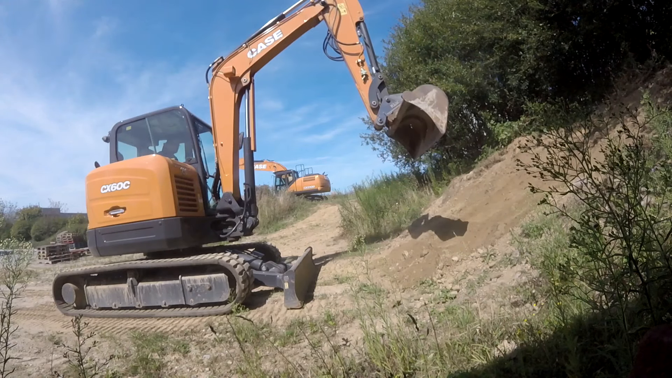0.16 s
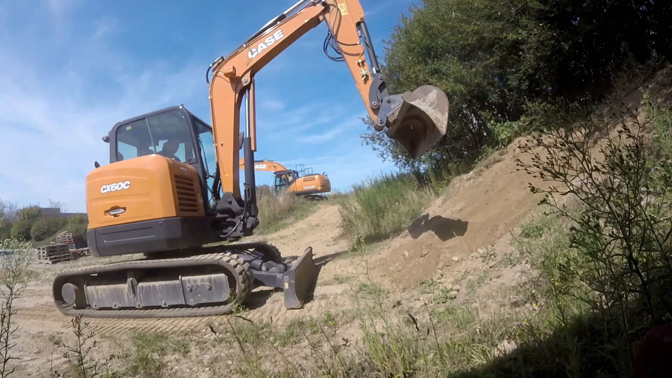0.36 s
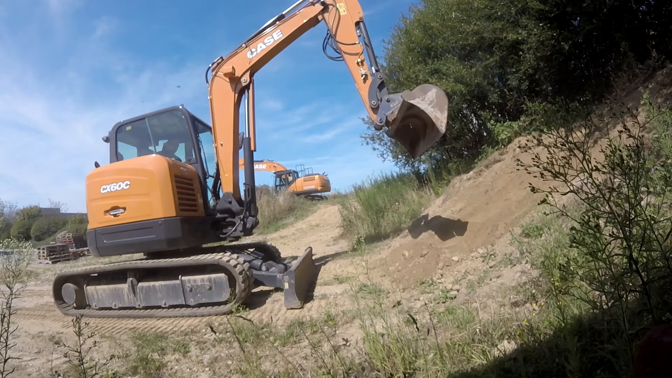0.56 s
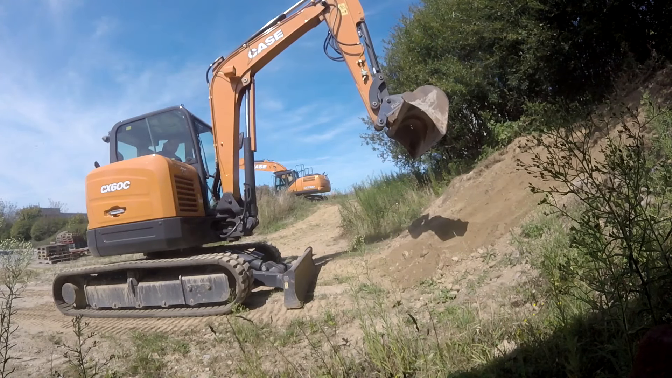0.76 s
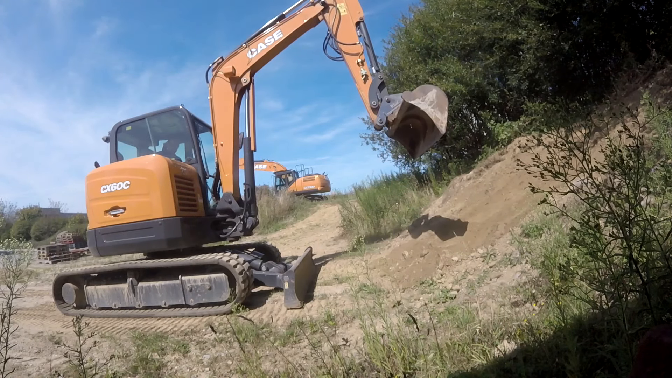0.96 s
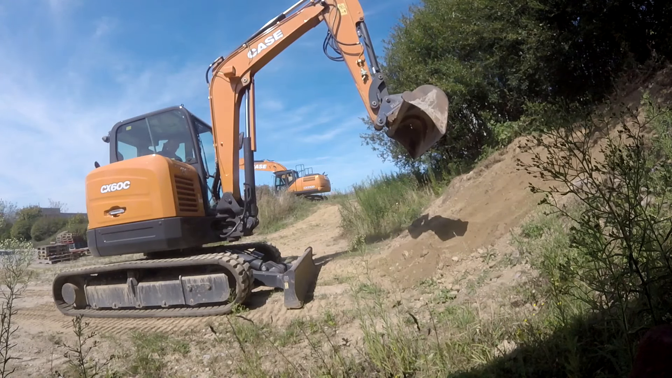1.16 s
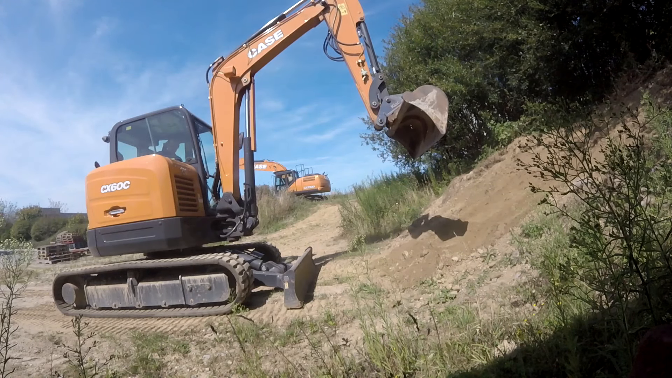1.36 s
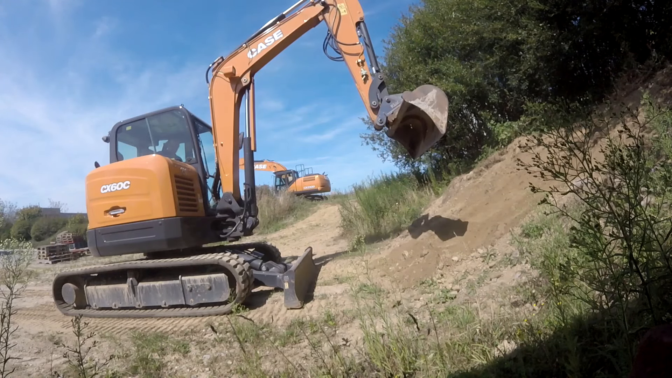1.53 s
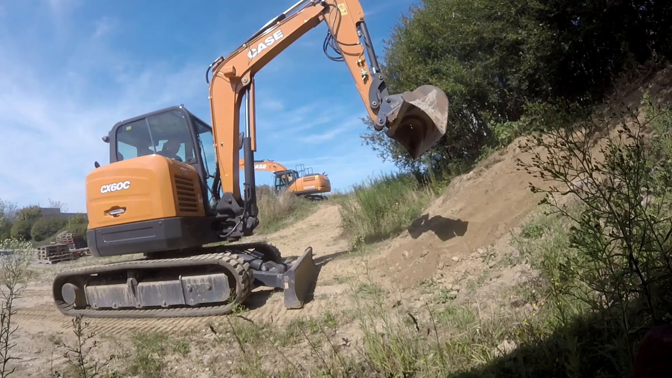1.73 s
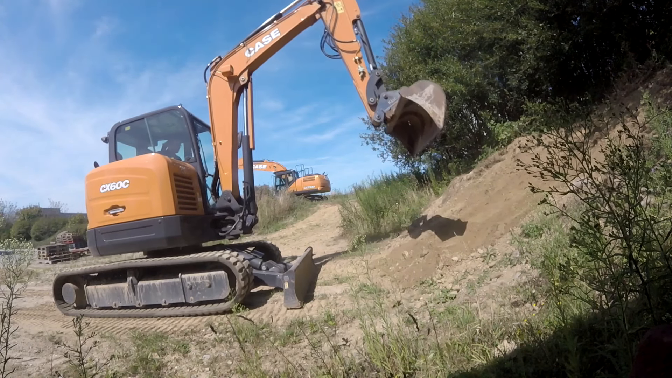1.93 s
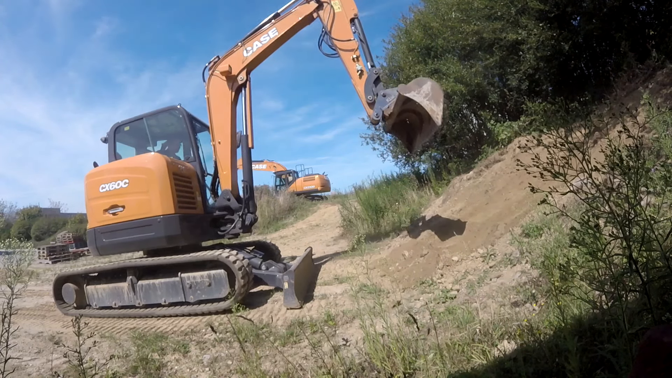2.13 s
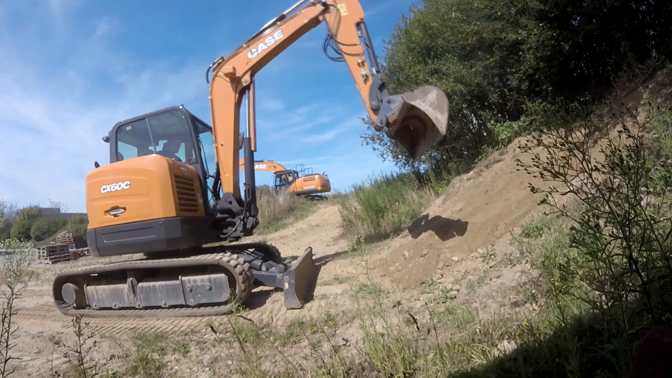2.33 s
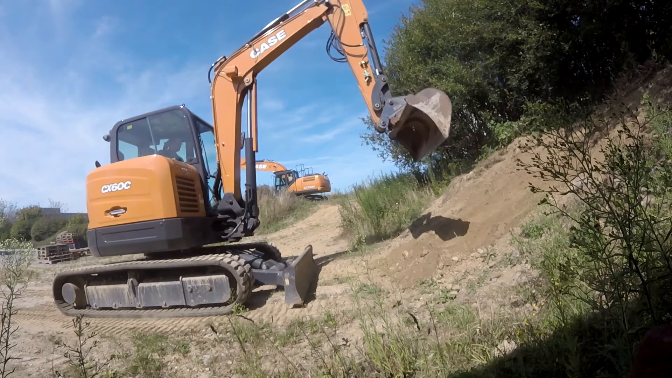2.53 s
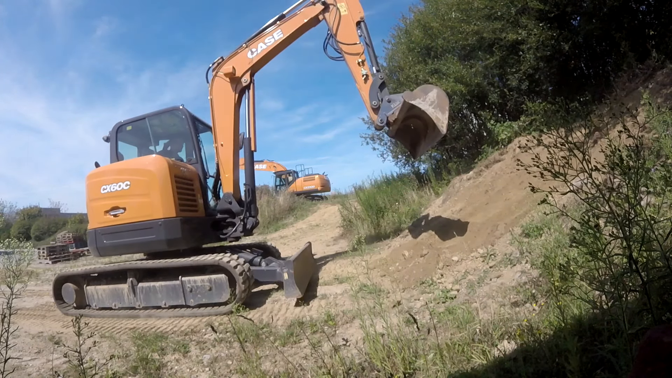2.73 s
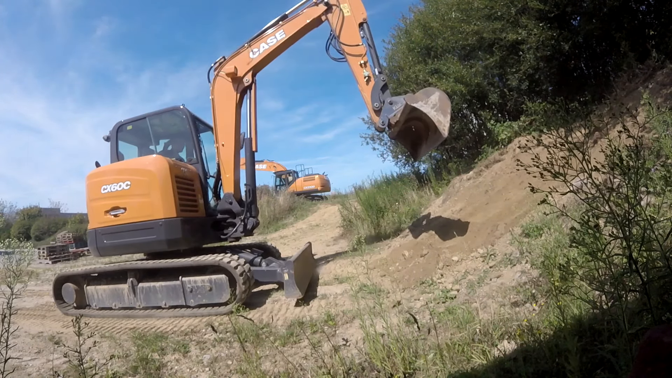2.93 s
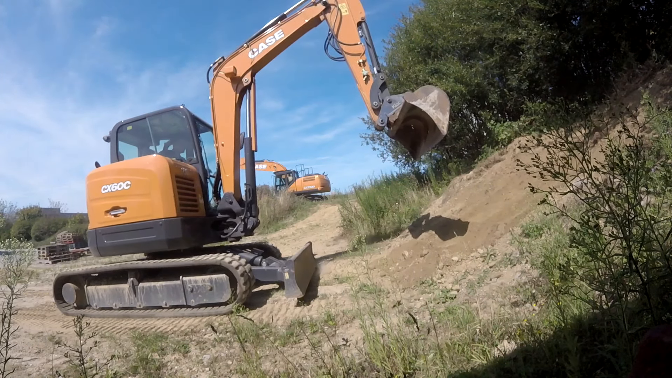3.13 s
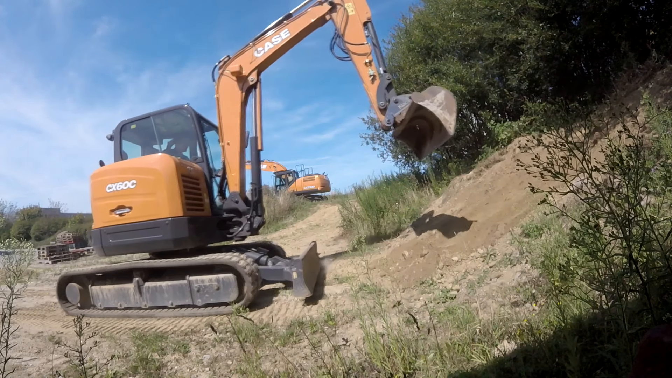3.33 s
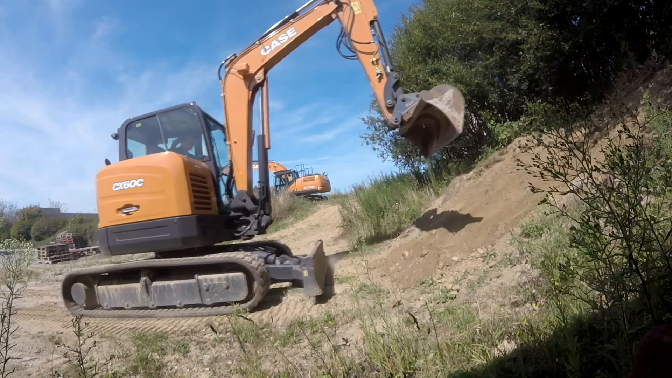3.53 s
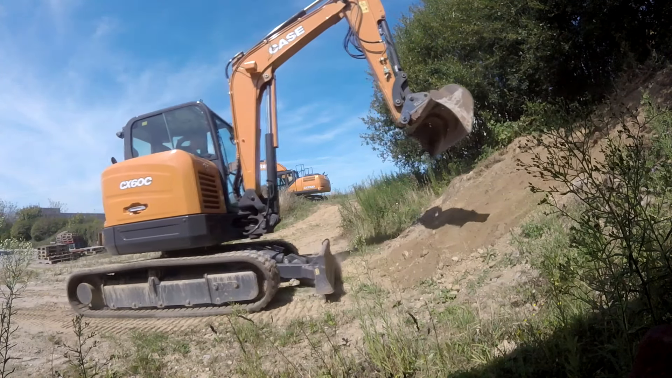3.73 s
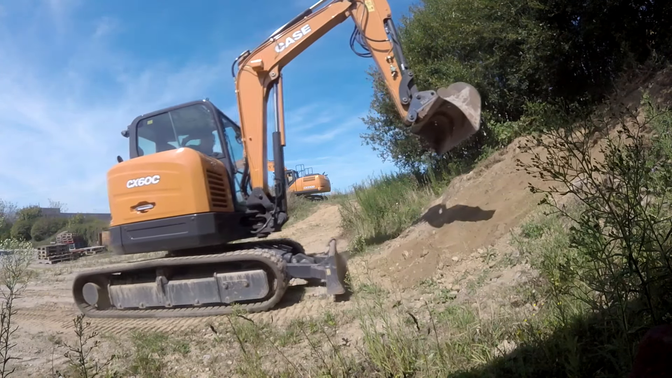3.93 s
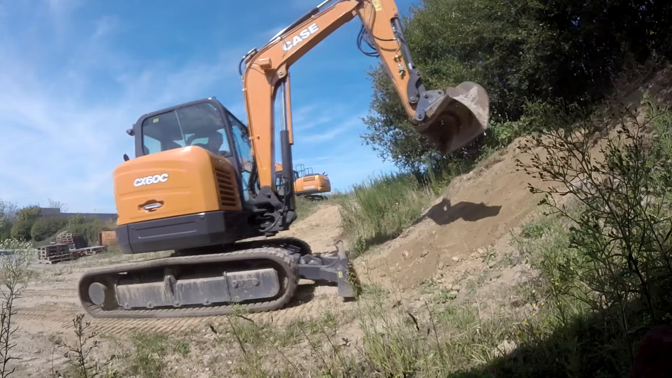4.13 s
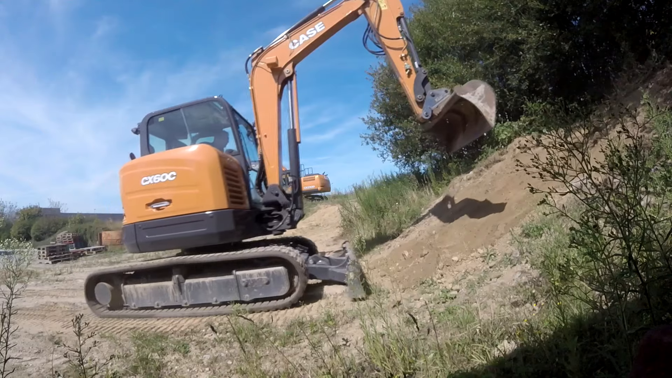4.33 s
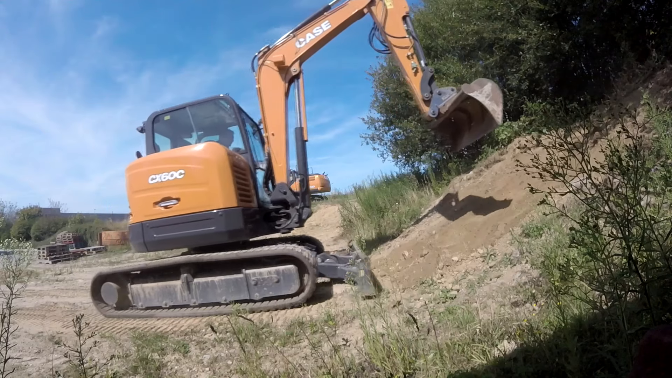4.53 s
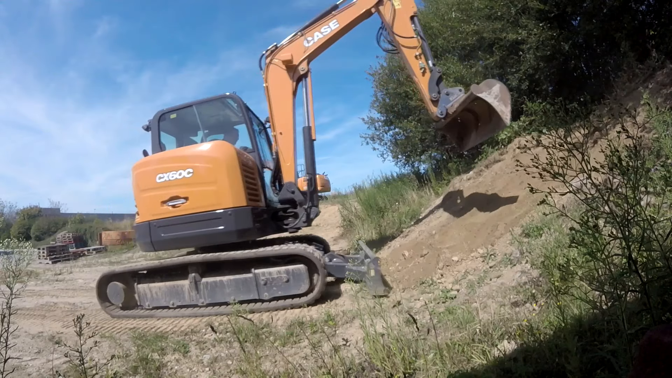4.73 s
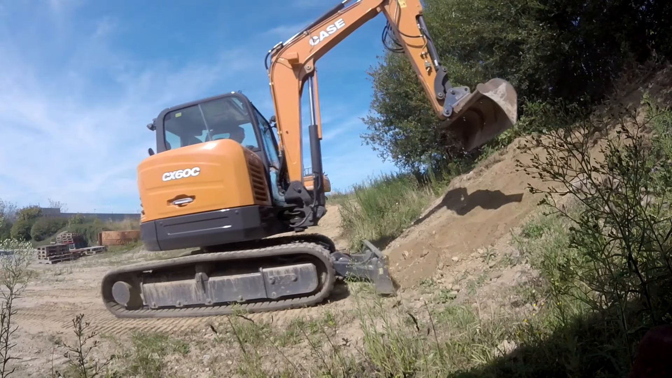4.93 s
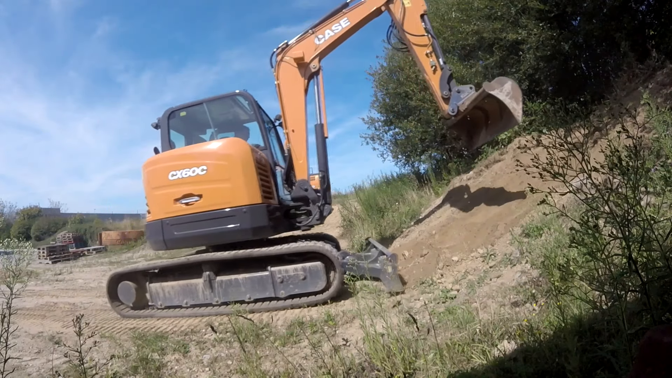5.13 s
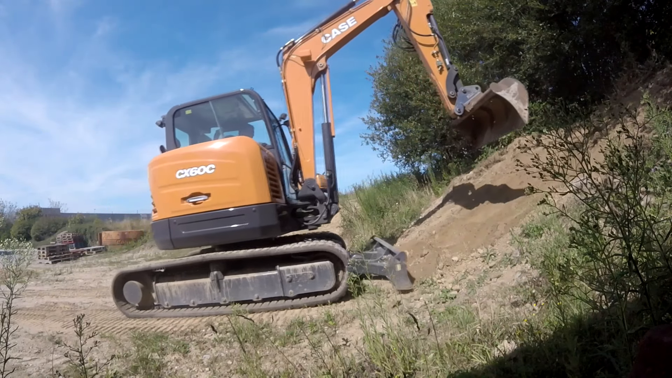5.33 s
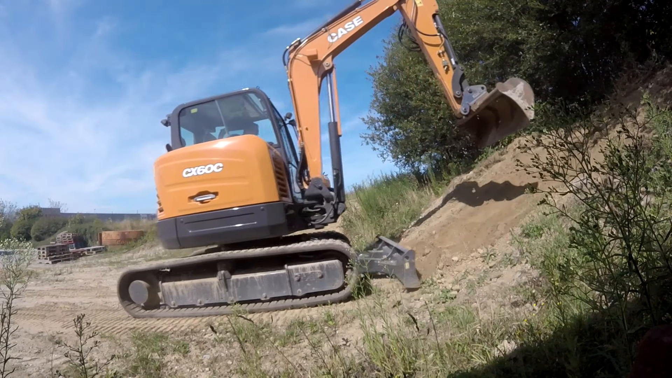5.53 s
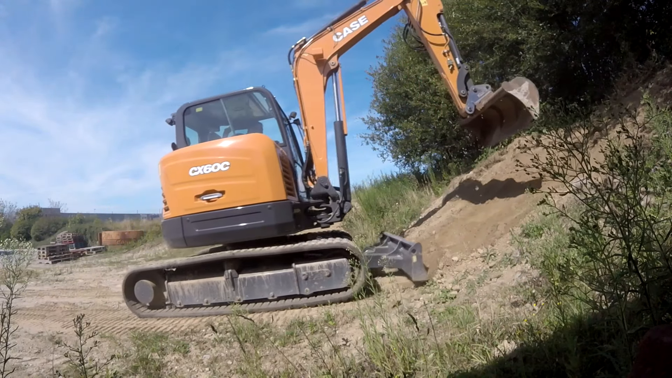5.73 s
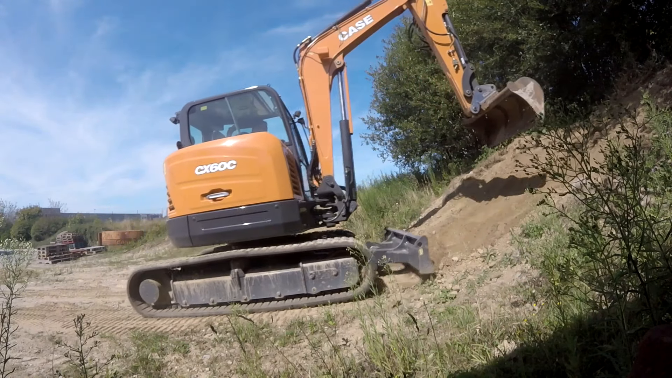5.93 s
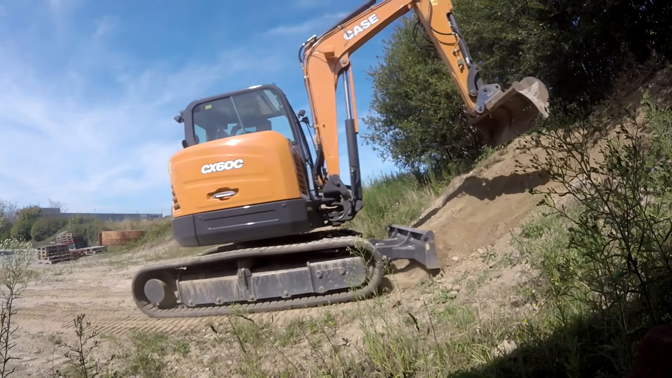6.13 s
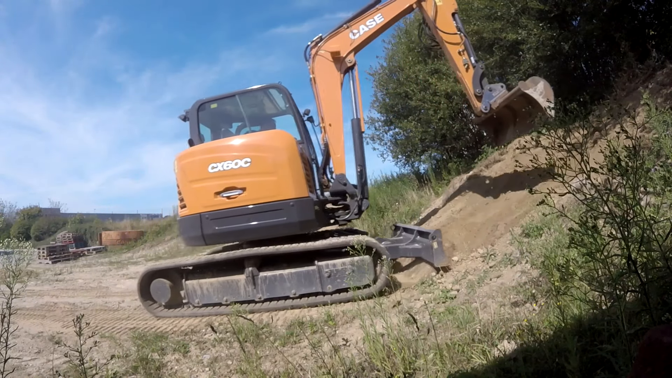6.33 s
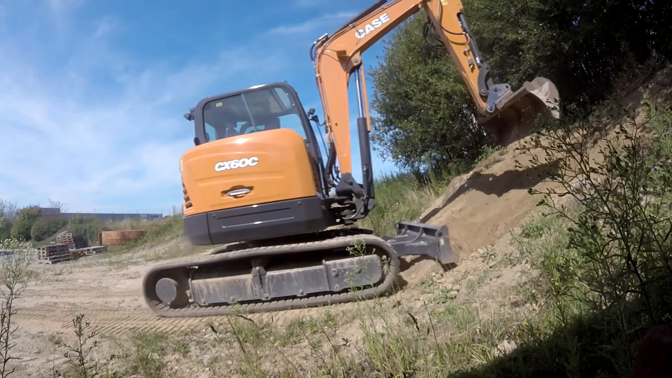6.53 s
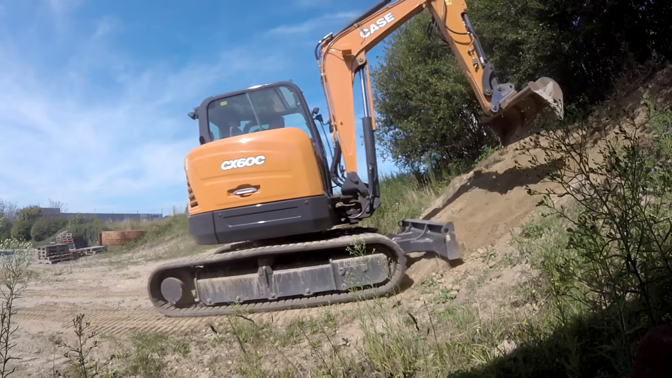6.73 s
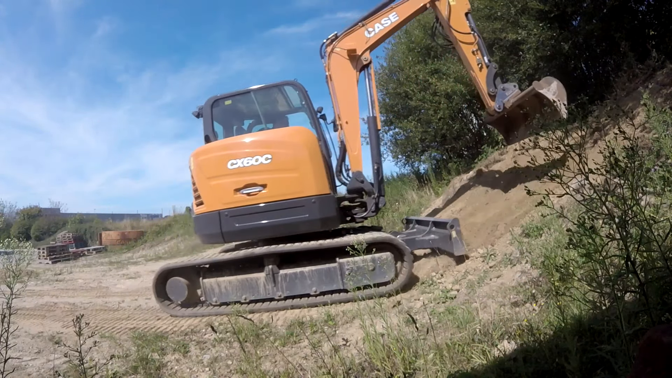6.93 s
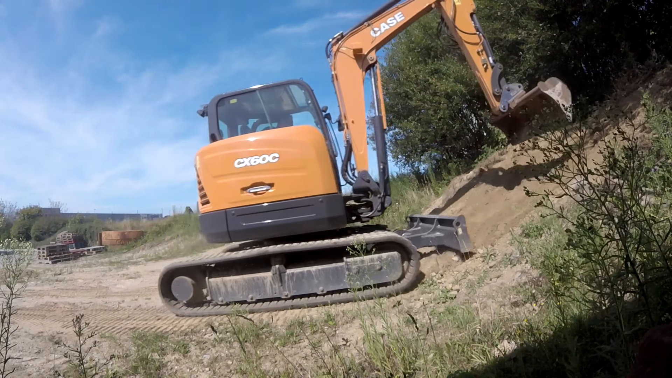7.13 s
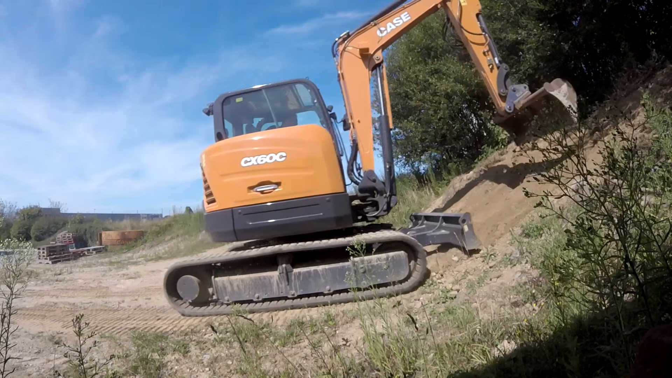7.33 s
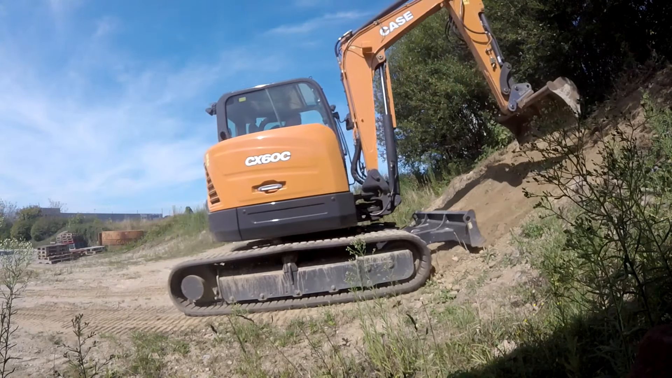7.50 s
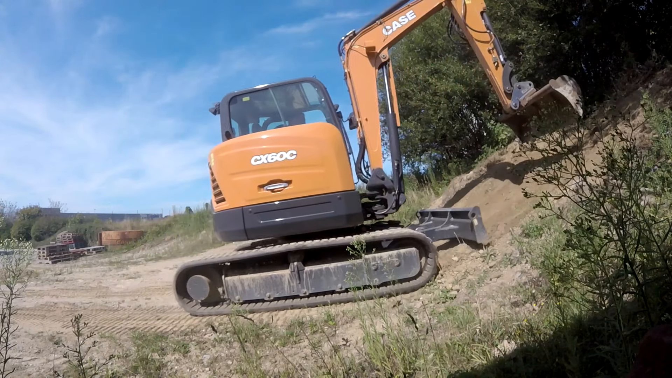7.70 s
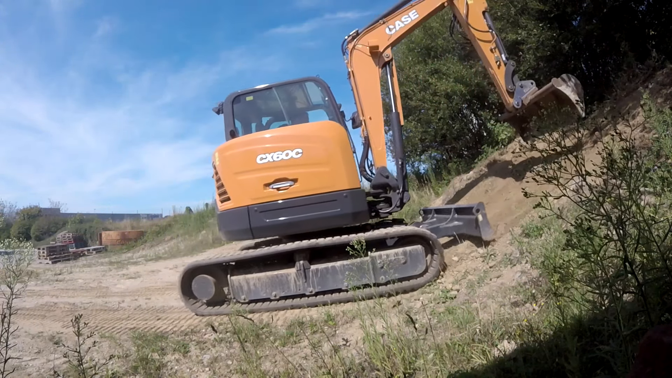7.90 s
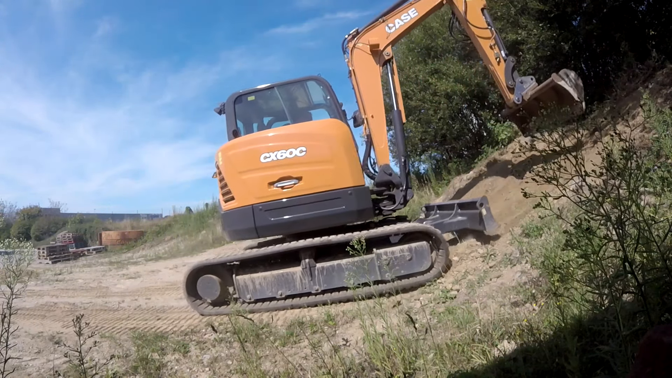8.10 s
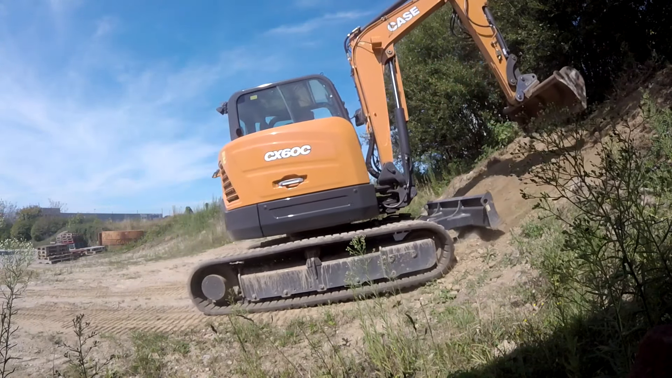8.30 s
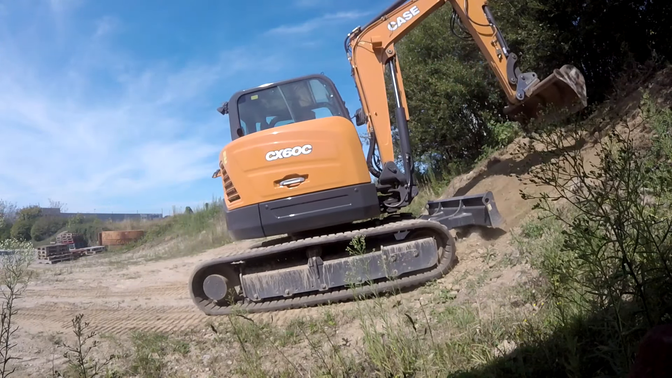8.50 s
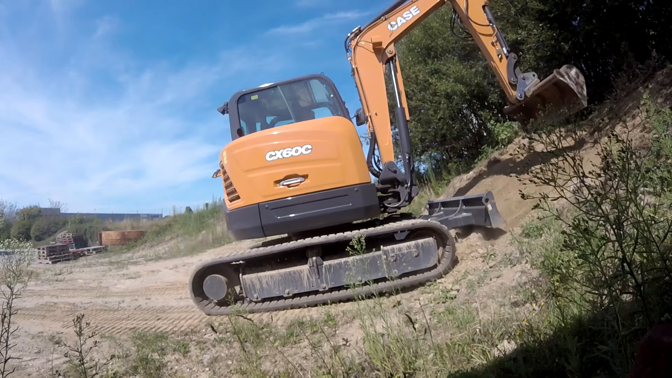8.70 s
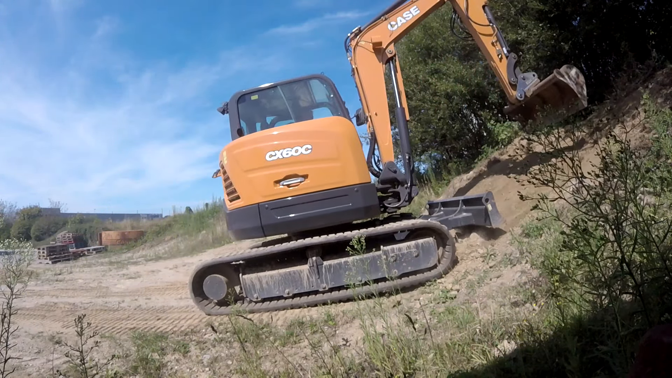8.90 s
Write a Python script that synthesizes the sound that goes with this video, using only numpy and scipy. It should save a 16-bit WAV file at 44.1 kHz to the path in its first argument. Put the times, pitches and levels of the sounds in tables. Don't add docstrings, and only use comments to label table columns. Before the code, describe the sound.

A small diesel excavator idles with a pulsing exhaust, revs up, sags briefly, then crawls up a bank with droning, thumping and rattling tracks.

```python
import sys
import numpy as np
from scipy import signal
from scipy.fft import rfft, irfft, next_fast_len
from scipy.io import wavfile
from scipy.ndimage import uniform_filter1d

SR = 44100
rng = np.random.default_rng(int(sys.argv[2]) if len(sys.argv) > 2 else 0)


def put_to_file(sound):
    columns = np.atleast_2d(sound).T
    safe = np.clip(columns, -1, 1)
    whole_steps = np.round(safe * 32767)
    wavfile.write(sys.argv[1], SR, whole_steps.astype(np.int16))


def attenuation_scalar(level_db):
    decades = np.asarray(level_db, float) / 20
    return 10 ** decades


N = 399546
T = np.arange(N) / SR


def curves(table):
    s, *columns = np.transpose(table)
    return [np.interp(T, s, c) for c in columns]


def swells(rows, size):
    return sum(size(v) * np.exp(-(2 * (T - s) / length) ** 2) for s, v, length in rows)


def unit(x):
    return x / np.sqrt(np.mean(x ** 2))


def turn(hz):
    return 2 * np.pi * np.cumsum(hz) / SR


def walk(rate):
    k = int(SR / rate)
    steps = np.repeat(rng.standard_normal(N // k + 1), k)
    return unit(uniform_filter1d(uniform_filter1d(steps, k), k)[:N])


def colour(x, points, lo_hz, hi_hz, boosts=()):
    size = next_fast_len(N)
    f = np.arange(size // 2 + 1) * SR / size + 1e-3
    hz, db = np.transpose(points)
    db = np.interp(np.log(f), np.log(hz), db)
    db = db + sum(boost / (1 + (2 * (f - centre) / width) ** 2) for centre, width, boost in boosts)
    edges = 1 / np.sqrt((1 + (lo_hz / f) ** 12) * (1 + (f / hi_hz) ** 12))
    return unit(irfft(rfft(x, size) * attenuation_scalar(db) * edges, size)[:N])


def ring(x, hz, width_hz):
    return signal.lfilter(*signal.iirpeak(hz, hz / width_hz, SR), x)


def ring_twice(x, hz, width_hz):
    return ring(ring(x, hz, 2 * width_hz), hz, width_hz)


def add(out, s, x):
    i = int(s * SR)
    out[i:i + len(x)] += x[:N - i]


# frequency in Hz, level in dB per Hz
AIR_TONE = [(4, -7), (25, -1), (45, -9.5), (65, -4.5), (90, -5.5), (125, -8.5), (165, -7.5), (220, -22.5),
            (300, -14), (420, -25.5), (600, -44.5)]
AIR_DB = -34


def air():
    swell_db = 1.2 * walk(2.5)
    return attenuation_scalar(AIR_DB + swell_db) * colour(rng.standard_normal(N), AIR_TONE, 2, 510)


# frequency in Hz, level in dB
WHISTLE_TONES = [(9651, -79.5)]


def hydraulics():
    return np.sqrt(2) * sum(attenuation_scalar(db) * np.sin(2 * np.pi * hz * T) for hz, db in WHISTLE_TONES)


# time in seconds, length in seconds, level in dB, lowest Hz, highest Hz
GRIT_SCRAPES = [
    (2.429, 0.12, -31.5, 500, 4200),
    (4.714, 0.11, -43, 2000, 5500),
    (6.35, 0.071, -32, 330, 900),
    (7.231, 0.04, -34, 450, 720),
    (3.865, .014, -36, 2050, 2400),
    (7.405, 0.068, -36, 1200, 2000),
    (8.554, 0.061, -34, 1090, 1710),
]
LINKS_PER_S, LINK_S, LINK_SCATTER_DB = 22, .014, 3


def grit():
    link = np.cumsum(LINKS_PER_S * (1 + .2 * walk(30))) / SR
    size = attenuation_scalar(LINK_SCATTER_DB * rng.standard_normal(int(link[-1]) + 1))[link.astype(int)]
    decay = np.exp(-(link % 1) / LINKS_PER_S / LINK_S)
    loose = rng.standard_normal(N) * (.25 + size * decay)
    rattle = sum(ring(ring(loose, hz, 300), hz, 160) for hz in (950, 1050, 1180))
    bonnet_db = loudness()[0]
    out = curves(TRACK_PULL)[0] * attenuation_scalar(bonnet_db - 6.5) * unit(rattle)
    sand = rng.standard_normal(N) * attenuation_scalar(2 * walk(120))
    for s, length, db, lo_hz, hi_hz in GRIT_SCRAPES:
        drag = np.hanning(int(length * SR))
        scrape = colour(sand, HISS_TONE, lo_hz, hi_hz)[int(s * SR):][:len(drag)]
        add(out, s - length / 2, attenuation_scalar(db) * drag * scrape)
    return out


# start in seconds, peak level in dB, ring in Hz
PIN_KNOCKS = [(2.401, -29, 1090), (2.434, -24.5, 1103), (3.535, -38, 1170), (3.579, -28, 1140),
              (3.624, -30, 1120), (3.682, -25.5, 1140), (3.719, -24, 1083), (3.825, -31, 1150),
              (3.87, -30, 1170), (4.109, -28.5, 1170), (4.256, -30, 1126), (5.224, -28, 1075),
              (5.253, -27.5, 1170), (5.396, -31, 1075), (5.437, -27, 1170), (5.624, -29, 1170),
              (5.704, -28, 1084), (5.896, -28.5, 1077), (6.12, -27, 1084), (6.536, -27.5, 1054),
              (6.749, -27, 1053), (6.902, -27, 1055), (6.932, -26, 1142), (6.978, -29, 1034),
              (7.144, -26.5, 1065), (7.214, -28.5, 995), (7.314, -32, 1170), (7.389, -28, 1035),
              (7.405, -28, 1156), (8.034, -30, 1070)]


def pins():
    out, t = np.zeros(N), T[:SR // 8]
    swell = (1 - np.exp(-t / .0015)) * np.exp(-t / .011)
    for (s, db, hz), start in zip(PIN_KNOCKS, rng.random((len(PIN_KNOCKS), 4))):
        modes = zip((1, 1.09, .62, 2.0), (-0.5, -8.5, -10.0, -18.5), start)
        knock = sum(attenuation_scalar(part_db) * np.sin(2 * np.pi * (hz * k * t + p)) for k, part_db, p in modes)
        add(out, s, attenuation_scalar(db + 1) * knock * swell / swell.max())
    return out


# time in seconds, shake of the body in dB
ROUGHNESS = [(0, -41), (1.8, -46.5), (2.33, -40), (2.45, -27), (2.7, -38), (3.1, -42), (3.3, -23.5),
             (4.6, -25), (5.5, -29.5), (6.8, -27), (7.2, -31), (7.95, -33), (8.1, -26), (8.35, -28.5),
             (8.55, -39.5), (9.06, -38)]
# frequency in Hz, width in Hz, level in dB
BODY_MODES = [(164, 10, -8), (198, 42, -6), (228.6, 11.9, 1), (247.1, 13.8, 1.5), (266.5, 14, -5.5),
              (290.5, 5.4, -25.5)]
# middle in seconds, peak level in dB, ring in Hz, length in seconds
LUG_THUMPS = [(2.469, -21.5, 245, 0.044), (3.24, -17, 245, 0.15), (3.33, -17, 238.6, 0.22),
              (3.527, -15, 245.8, .2), (3.63, -12, 243.5, .1), (3.748, -19, 258, .09),
              (3.847, -20, 239.7, .13), (3.922, -14, 247, .05), (4.133, -19, 248.8, .2),
              (4.277, -21, 256.5, .2), (4.435, -13.5, 260, 0.057), (4.65, -13, 253.4, 0.1),
              (4.872, -16, 247.4, 0.073), (5.075, -14, 257.6, 0.062), (5.204, -16, 264.5, .09),
              (5.271, -14.5, 241.2, 0.19), (5.52, -16.5, 241, 0.22), (5.747, -20.5, 241, 0.16),
              (5.923, -13, 260, .04), (5.982, -12, 240.5, 0.093), (6.355, -14, 252, 0.0405),
              (6.42, -17, 242.3, .13), (6.608, -21.5, 246, 0.093), (6.819, -20, 234.4, 0.18),
              (6.902, -22, 241, .06), (7.142, -22, 245.5, 0.17), (7.659, -18, 252, 0.041),
              (8.063, -13.5, 234.6, .2), (8.188, -13, 262.4, .1), (8.354, -21, 273, .077)]
# middle in
# seconds, peak level in dB, ring in Hz
MORE_THUMPS = [(3.322, -21, 205), (3.536, -19, 200), (3.646, -13, 199.2), (4.666, -22.5, 178),
               (4.714, -17, 208.4), (5.265, -16, 209.6), (5.467, -22, 210), (6.34, -22.5, 169),
               (8.039, -17, 216), (8.207, -21, 175), (3.15, -31, 151), (3.273, -24, 153),
               (6.679, -24, 149), (5.634, -20.5, 256), (7.011, -19.5, 240.4), (7.31, -24, 240.4),
               (7.411, -24, 246), (7.495, -21, 241), (7.799, -23, 250), (8.074, -21, 282),
               (8.12, -22, 150)]
MORE_THUMP_S = .09
GROUND_DB, GROUND_SHARE = -30.5, .8


def body():
    hum_db = curves(ROUGHNESS)[0]
    shake = rng.standard_normal(N) * attenuation_scalar(2.6 * walk(12))
    hum = unit(sum(attenuation_scalar(db) * ring_twice(shake, hz, w) for hz, w, db in BODY_MODES))
    ground_db = GROUND_DB + GROUND_SHARE * (hum_db - hum_db.max())
    ground = colour(rng.standard_normal(N), AIR_TONE, 32, 125)
    out = attenuation_scalar(hum_db) * hum + attenuation_scalar(ground_db) * ground
    knocks = [*LUG_THUMPS, *((*thump, MORE_THUMP_S) for thump in MORE_THUMPS)]
    for (s, db, hz, length), start in zip(knocks, rng.random(len(knocks))):
        swell = np.hanning(int(length * SR))
        tone = np.sin(2 * np.pi * (hz * T[:len(swell)] + start))
        add(out, s - length / 2, attenuation_scalar(db) * swell * tone)
    return out


# time in seconds, pull from 0 to 1
TRACK_PULL = [(2.25, 0.6), (2.4, 0.67), (2.95, 0.95), (3.05, 0.01), (3.4, 0.9), (3.6, 1), (8.55, 0.97),
              (9, 0.37)]
# frequency in Hz, wander in Hz, steady level in dB,
# and a list of shudders, each with its middle in seconds, peak level in dB and length in seconds
FRAME_MODES = [
    (84.06, 0.49, -30, [(2.5, -42, 0.34), (3.3, -28.5, 0.33), (3.75, -27, 0.45), (4.65, -28.5, 0.72), (5.42, -14.5, 0.78), (5.95, -20.5, 0.73), (7.05, -18, 0.37), (8.25, -16.5, 0.7)]),
    (51.06, .4, -29, [(3.3, -32, 0.26), (4.72, -27, .35), (5.75, -29.5, 0.25), (6.62, -28, .5), (7.5, -31, .4), (8.3, -33, 0.71)]),
    (40.2, 1.22, -41.5, [(2.5, -30, 0.31), (3.55, -32, .5), (4.33, -26.5, 0.91), (5.45, -25, 0.63)]),
    (90.85, 1.53, -39.5, [(3.8, -31, 0.48), (4.2, -24, 0.31), (4.75, -20.5, 0.19), (5.72, -26, 0.34), (7.08, -29, 0.77), (8.45, -36, 0.52)]),
]


def frame():
    pull = curves(TRACK_PULL)[0] * np.clip(T - 1.5, 0, 1)
    out = np.zeros(N)
    for hz, wander_hz, db, shudders in FRAME_MODES:
        level = pull * attenuation_scalar(db) + swells(shudders, attenuation_scalar)
        out += level * np.cos(turn(hz + wander_hz * walk(2)))
    return np.sqrt(2) * out


# time in seconds, load from 0 to 1
ENGINE_LOAD = [(0, 0.7), (.04, 0.2), (.25, 0), (1.85, 0), (2, 0.32), (2.5, .45), (3.08, 0.04), (3.28, 0.4),
               (3.45, 0.94), (4.2, 0.87), (5.5, 0.82), (6.5, 1), (8.85, 0.94), (9.06, .7)]
# middle in seconds, rise in dB, length in seconds
VALVE_SPURTS = [
    (0, 4, 0.021),
    (.22, 3, 0.32),
    (1.935, 6.5, 0.056),
    (3.22, 8, 0.12),
    (3.43, 3.5, .06),
    (8.91, 2.5, 0.13),
]
# idle level in dB, rise under full load in dB, share of a valve spurt
PART_NOISE = [
    (-40, 6.5, 0.055),
    (-48.5, 5, 0.29),
    (-60, 5.5, 0.92),
]
TURN_S, TURN_DB_PER_S = 3.13, -0.63


def loudness():
    load, spurt_db = curves(ENGINE_LOAD)[0], swells(VALVE_SPURTS, float)
    bonnet, block, injectors = (db + rise_db * load + share * spurt_db for db, rise_db, share in PART_NOISE)
    return bonnet + TURN_DB_PER_S * np.maximum(T - TURN_S, 0), block, injectors


# time in seconds, firing rate in Hz, exhaust level in dB,
# second order against the first in dB
ENGINE_RUN = [(0, 57.5, -29, -9), (.12, 55.8, -31.5, -9), (.24, 52.9, -29, -4), (.5, 53.3, -24.8, -6.5),
              (1.8, 53.1, -26, -6), (1.95, 53.9, -22, -5.5), (2.25, 57.2, -27.5, -5),
              (2.45, 56.3, -27, -6.5), (2.83, 56.2, -24.3, -5.5), (3, 57, -33, -11), (3.1, 49.5, -40, 0),
              (3.2, 51.6, -27, -1), (3.35, 55.3, -22.5, -7), (3.52, 59.2, -24.8, -2),
              (4.2, 58.7, -23.5, -3), (6.6, 58.7, -22, -7), (8.55, 58.7, -22.7, -9), (9.06, 59.2, -38, 3)]
EXHAUST_ORDERS = [(1, 0), (2, .6)]
# middle in seconds, change in Hz, length in seconds
GOVERNOR_SURGES = [
    (4.72, .9, .35),
    (5.85, -.6, .4),
    (6.78, .9, .3),
    (7.1, .5, .2),
    (8.15, -.3, .4),
    (8.82, 1.6, .35),
]
# time in seconds, share from 0 to 1
IDLE_SHARE = [(0, 0.55), (.25, 0.75), (1.95, 1), (2.1, 0.54), (3, 0.54), (3.2, 0.1)]
# multiple of the firing rate, level in dB
IDLE_TONES = [(2.5, -46), (3, -35.5), (4.5, -49), (5, -37.5), (8, -57), (9, -59), (11, -52), (15, -55),
              (16.5, -53), (20, -53)]
# time in seconds, level in dB
PUMP_WHINE = [(3.3, -55), (3.8, -47.5), (4.6, -51), (5, -43), (5.9, -51), (6.2, -50.5), (7, -46),
              (7.5, -57), (8.5, -50), (8.85, -44.5)]
# frequency in Hz, level in dB per Hz
HISS_TONE = [(190, -38), (330, -5), (416, -3), (449, -7), (575, -5.5), (832, -5), (1170, -3), (1850, -17.5),
             (2260, -15.5), (2810, -19.5), (3540, -20.5), (4530, -26), (6560, -28), (12100, -39),
             (13100, -59.5)]
# frequency in Hz, width in Hz, boost in dB
PANEL_MODES = [(680, 260, 5), (900, 28, 6), (1170, 74, 5.5), (1543, 54, 6), (2295, 81, 4.5), (3010, 150, 3),
               (3530, 330, 6.5), (6170, 120, 6.5), (6870, 1100, 4)]
# lowest Hz, highest Hz, depth of the firing puff, trim in dB
NOISE_BANDS = [
    (330, 1780, 0.091, -0.58),
    (1786, 5350, 0.35, 0.67),
    (5500, 7700, 1.1, -1.86),
    (7970, 32000, 0.22, -6.5),
]
# frequency in Hz, width in Hz, level under load in dB
NEEDLES = [(5960, 120, -66.5), (6410, 140, -67)]
FOURTH_DB = -37.5
LUMPY_DB = 1.5
FLICKER_DB = .5


def exhaust_and_gears(crank, exhaust_db, second_db, load):
    lumps = LUMPY_DB * curves(TRACK_PULL)[0]
    order_db = exhaust_db + .5 * lumps * walk(6), exhaust_db + second_db + lumps * walk(8)
    tones = sum(attenuation_scalar(db) * np.cos(k * crank + lag) for (k, lag), db in zip(EXHAUST_ORDERS, order_db))
    idle = sum(attenuation_scalar(db) * np.cos(k * (crank - .15)) for k, db in IDLE_TONES)
    tones += curves(IDLE_SHARE)[0] * idle
    tones += attenuation_scalar(curves(PUMP_WHINE)[0]) * np.sin(10 * crank)
    tones += load * attenuation_scalar(FOURTH_DB) * np.cos(4 * crank)
    return np.sqrt(2) * tones


def knocks_and_hiss(bump):
    bonnet_db, block_db, knock_db = loudness()
    mean_db = knock_db.mean()
    fan_db = mean_db + 0.28 * (knock_db - mean_db)
    puff_size = attenuation_scalar(1.6 * (knock_db - mean_db))
    out = np.zeros(N)
    for db, (lo_hz, hi_hz, puff, trim_db) in zip((bonnet_db, block_db, knock_db, fan_db), NOISE_BANDS):
        gas = (1 + puff * puff_size * bump) * rng.standard_normal(N)
        gas /= np.sqrt(uniform_filter1d(gas ** 2, size=SR // 5))
        level = attenuation_scalar(db + trim_db + FLICKER_DB * walk(9))
        out += level * colour(gas, HISS_TONE, lo_hz, hi_hz, PANEL_MODES)
    return out


def injector_needles(bump, load):
    needles = rng.standard_normal(N) * bump ** 2 * attenuation_scalar(3.9 * walk(40))
    return load * sum(attenuation_scalar(db) * unit(ring_twice(needles, hz, w)) for hz, w, db in NEEDLES)


def engine():
    hz, exhaust_db, second_db = curves(ENGINE_RUN)
    load = curves(ENGINE_LOAD)[0]
    crank = turn(hz + swells(GOVERNOR_SURGES, float))
    cycle = crank / (2 * np.pi) + 0.74
    strength = attenuation_scalar(1.5 * rng.standard_normal(int(cycle[-1]) + 1))[cycle.astype(int)]
    bump = strength * np.sin(np.pi * cycle) ** 4
    tones = exhaust_and_gears(crank, exhaust_db, second_db, load)
    return tones + knocks_and_hiss(bump) + injector_needles(bump, load)


def scene():
    mix = air() + hydraulics() + grit() + pins() + body() + frame() + engine()
    return (mix * np.minimum(T / .004, 1))[None]


def starve(x, from_hz, slope):
    f, _, z = signal.stft(x, SR, nperseg=2048)
    share = np.clip(slope * (f[:, None] / from_hz - 1), 0, 1)
    power = uniform_filter1d(np.abs(z) ** 2, size=3, axis=0)
    weak = power < 2.3 * share * uniform_filter1d(power, size=20, axis=1)
    patch = np.kron(rng.random((len(f) // 8 + 1, z.shape[1] // 3 + 1)), np.ones((8, 3)))
    patch = patch[:len(f), :z.shape[1]]
    above_top = f[:, None] > 12000 + 1500 * patch[:1] ** 2
    keep = patch > .4 * share + above_top
    return signal.istft(z * ~weak * keep, SR, nperseg=2048)[1][:N]


def band_limit(x):
    return signal.sosfilt(signal.butter(12, 13270, fs=SR, output="sos"), x)


def record(dry):
    mix = starve(dry[0], from_hz=7000, slope=0.66)[None]
    return band_limit(mix)


dry = scene()
out = record(dry)
put_to_file(out)
```